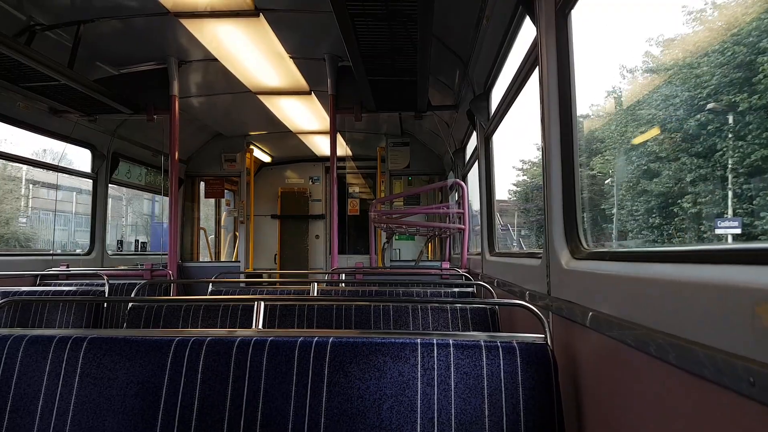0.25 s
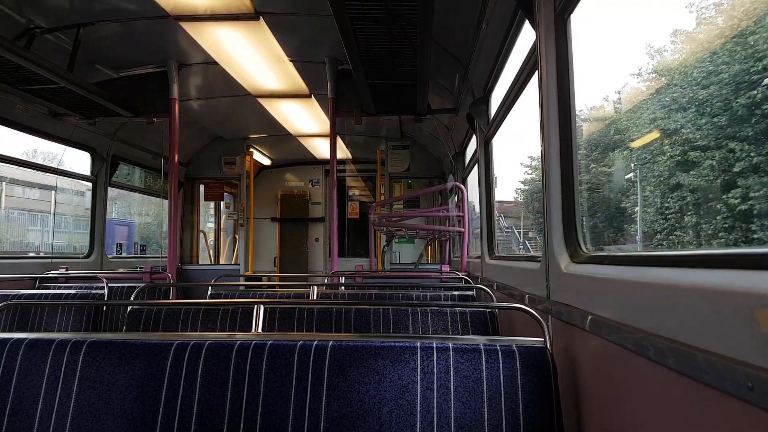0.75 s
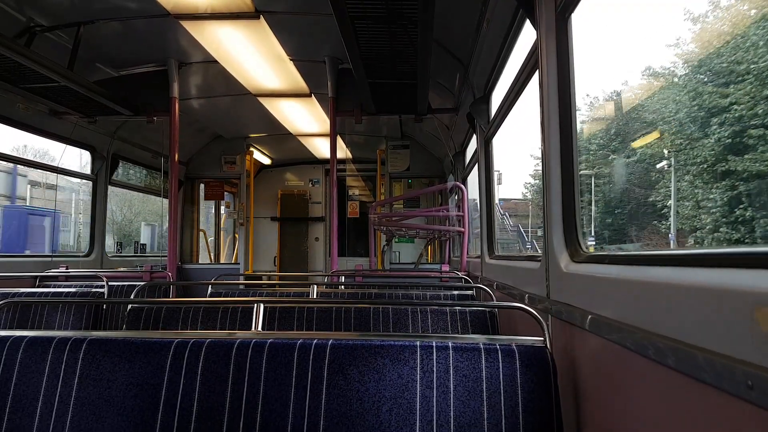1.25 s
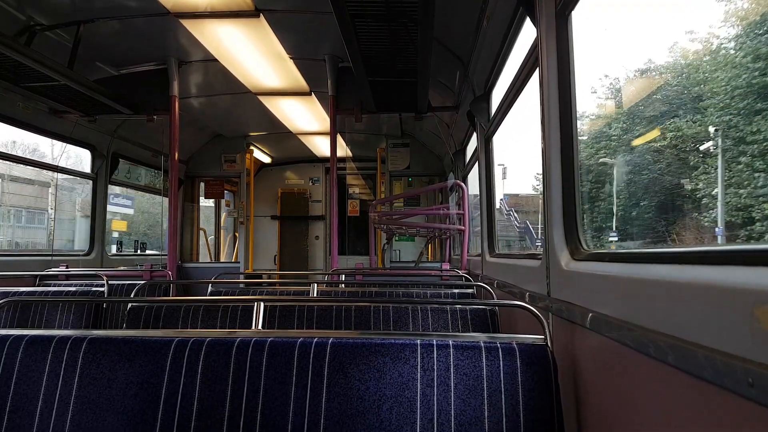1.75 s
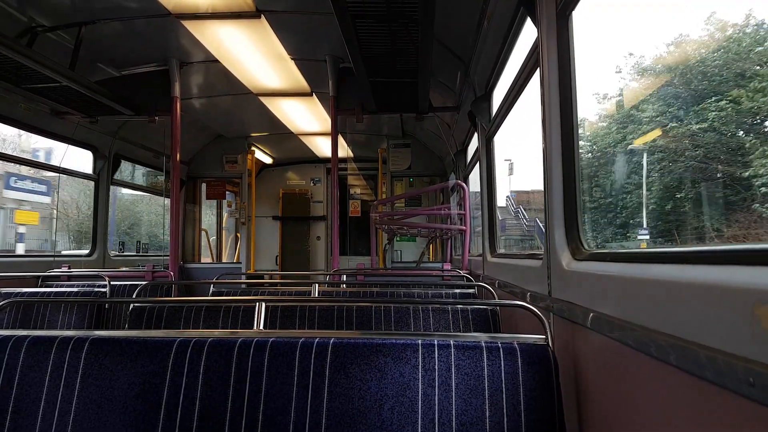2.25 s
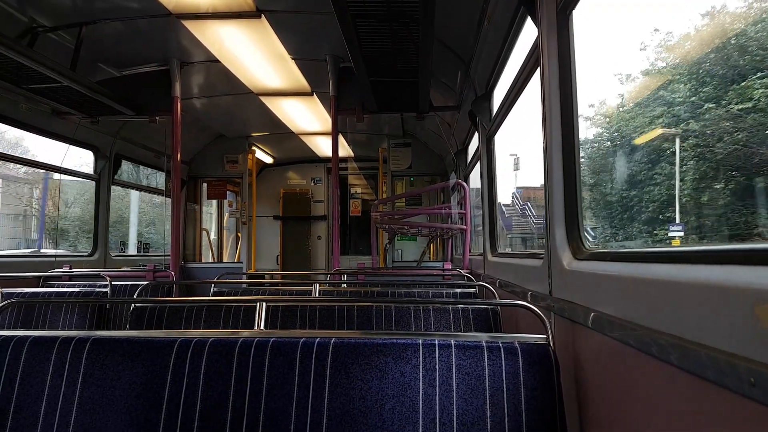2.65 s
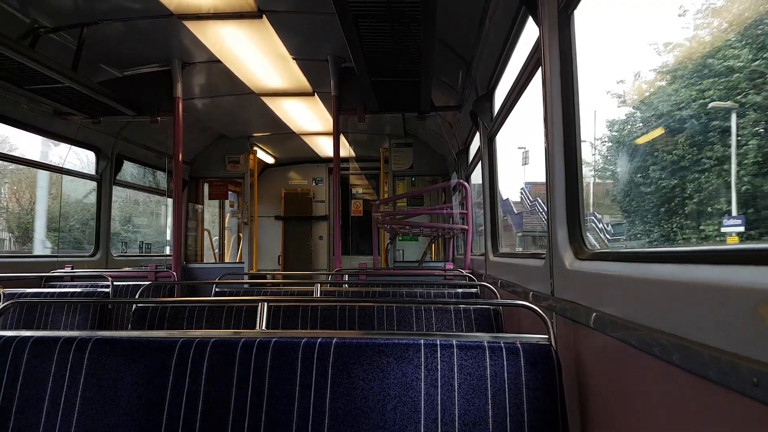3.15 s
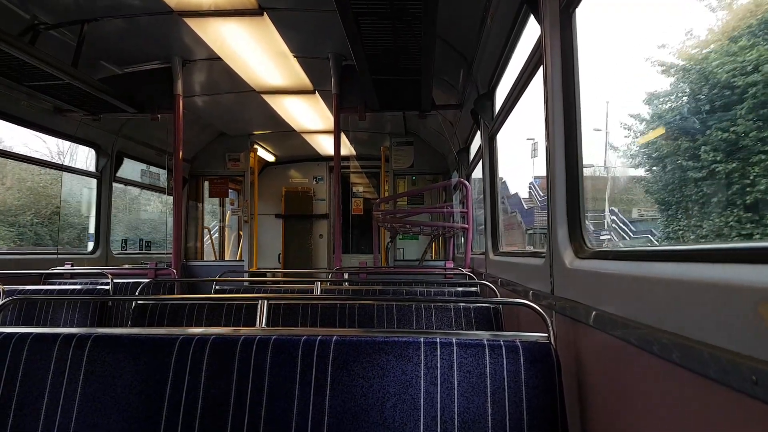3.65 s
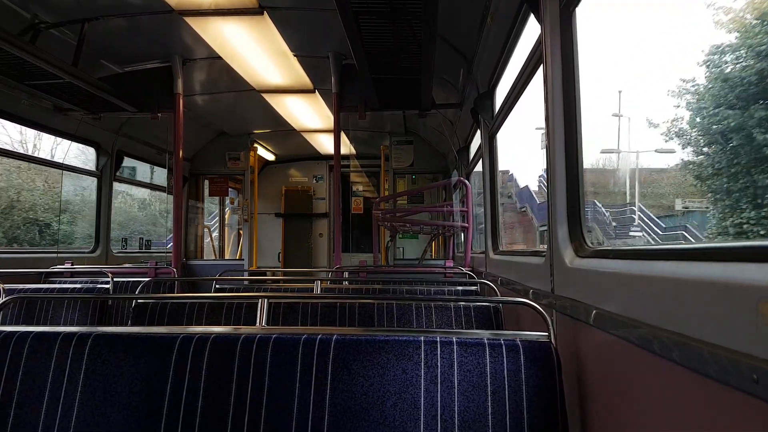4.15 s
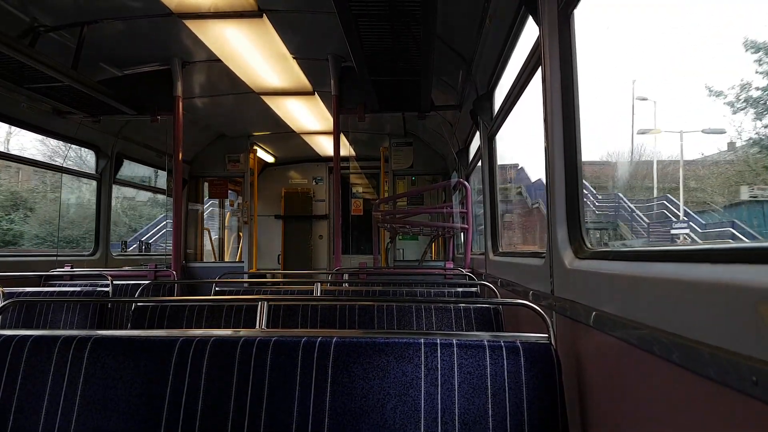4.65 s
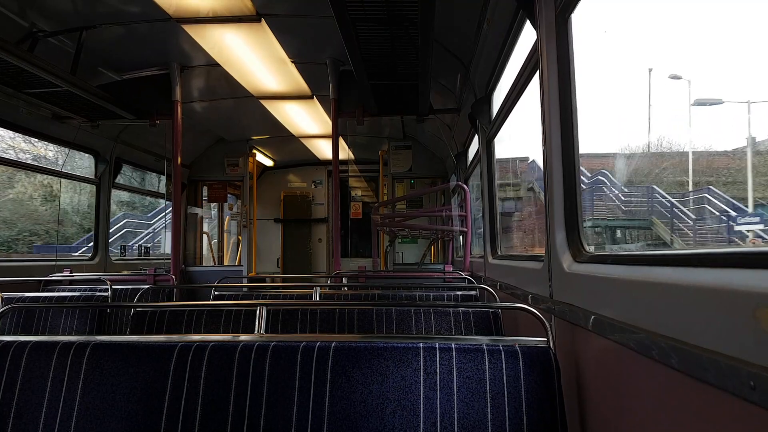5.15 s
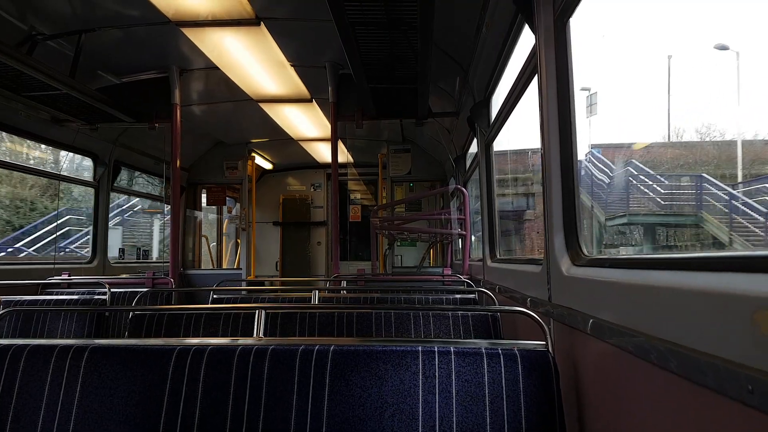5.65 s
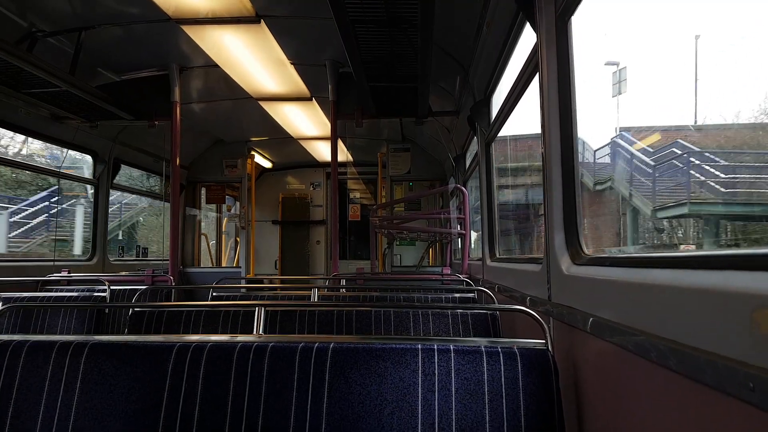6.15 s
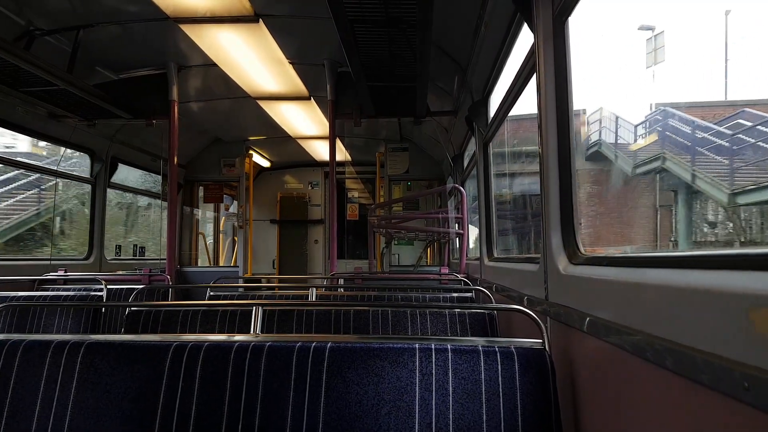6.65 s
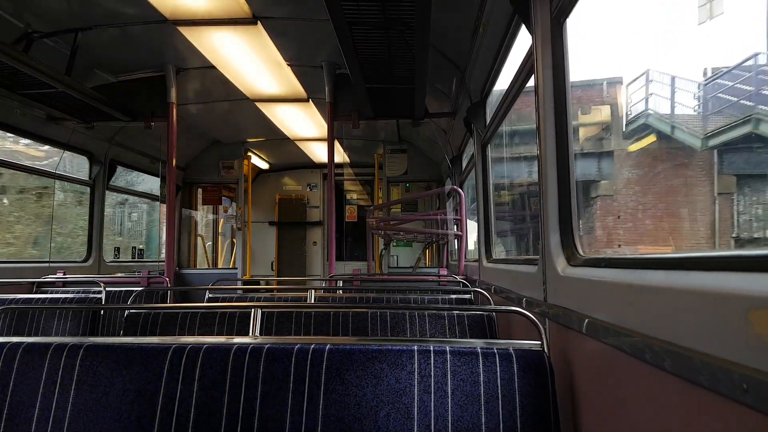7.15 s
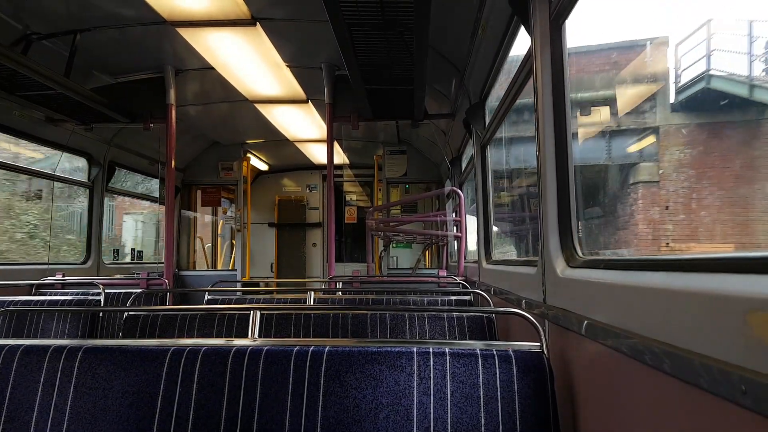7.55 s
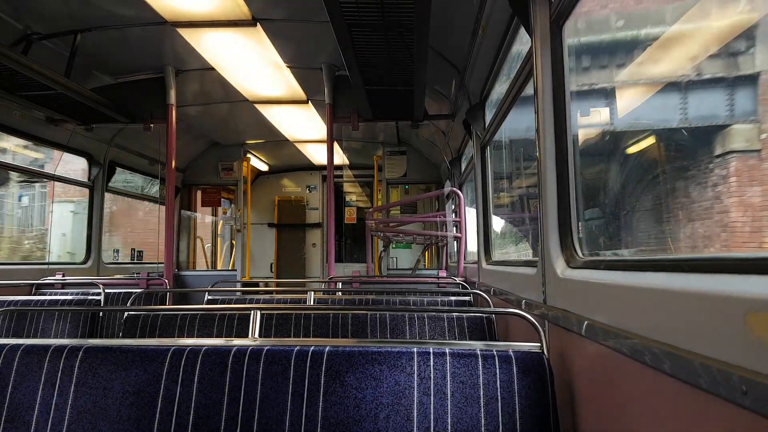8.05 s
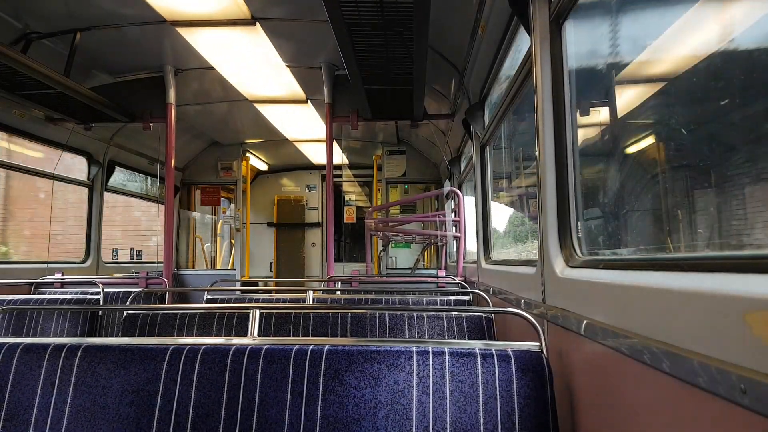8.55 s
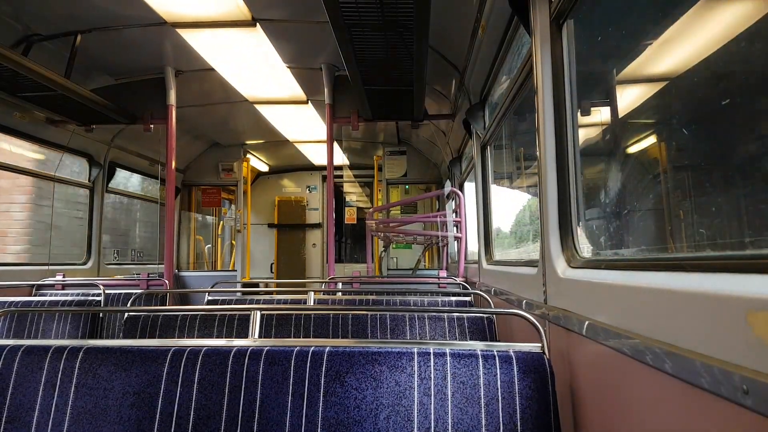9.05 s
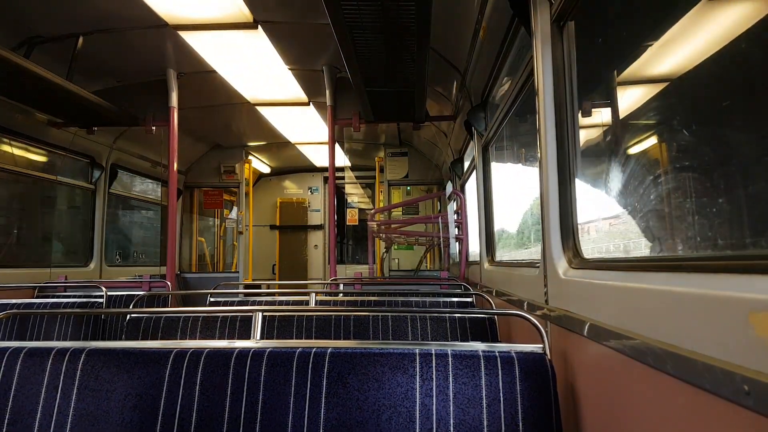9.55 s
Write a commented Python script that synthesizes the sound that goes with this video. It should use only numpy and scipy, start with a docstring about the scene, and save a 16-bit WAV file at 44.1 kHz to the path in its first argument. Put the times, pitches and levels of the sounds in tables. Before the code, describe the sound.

A small diesel train gathers speed, heard from the passenger seats. Two engines make a deep, beating drone that dominates throughout and steps up in pitch about a third of the way in. Beneath it the wheels rumble and hiss, the drive shaft faintly squeals, ticks and chirps, and loose fittings buzz between occasional floor thuds. Finally the wheels ring with a high, pulsing squeal as the train runs under a bridge.

```python
"""Inside the empty saloon of a diesel railbus that pulls away from a station and runs under a bridge.
Two underfloor engines drone at slightly different speeds and throb against each other; a fan hums and
a gear whines. Rolling noise grows with speed and the wheel flanges sing. The drive shaft squeals,
ticks and chirps in time with its turns, and the body rattles."""
import sys
import numpy as np
from scipy import signal
from scipy.fft import rfft, irfft
from scipy.io import wavfile
from scipy.ndimage import uniform_filter1d

SR = 44100
rng = np.random.default_rng(int(sys.argv[2]) if len(sys.argv) > 2 else 0)


def unload_audio(sound):
    """Save the sound as a 16-bit wav file, at the path given as the first command line argument."""
    columns = np.transpose(np.atleast_2d(sound))
    # keep every value between -1 and 1, then stretch to whole-number steps
    steps = np.round(np.clip(columns, -1, 1) * 32767)
    wavfile.write(sys.argv[1], SR, steps.astype(np.int16))


N = 431738
TIME = np.arange(N) / SR
BINS = np.fft.rfftfreq(N, 1 / SR)

# Jolts through the floor. Each row: time in seconds, dip in the drone from 0 to 1, thud level in dB.
JOLTS = [(2.3, .2, -34), (2.61, .45, -31), (4.555, .55, -24), (6.98, 0, -24), (8.52, .3, -31)]
# Firing rates at first and in the low and high throttle notch; each engine opens up at opens_s.
NEAR_ENGINE = dict(first_hz=83.8, low_hz=86.5, high_hz=92.1, opens_s=3.1, sag_hz_per_s=.17)
FAR_ENGINE = dict(first_hz=91.5, low_hz=95.54, high_hz=99.8, opens_s=2.91, sag_hz_per_s=.115)
PULL_S, NOTCH_S = 1, .85  # time to reach the low notch, and to go from low to high


def engines():
    """Two firing tones boom and beat; weaker overtones change balance as the revs rise."""
    # Near engine. Each row: multiple of the six-cylinder cycle, level in dB in the low and high notch.
    cycle_orders = [(1, -64, -51), (5, -46, -37), (7, -48, -44), (12, -39, -39), (18, -53, -41.5),
                    (20, -54, -58), (37, -66, -49.5), (42, -52, -64), (46, -70, -49), (79, -70, -66),
                    (92, -61, -70), (100, -75, -56)]
    near_hz, far_hz = firing(**NEAR_ENGINE), firing(**FAR_ENGINE)
    near, far = turns(near_hz), turns(far_hz)
    near_db = settling(-11.5, offset_db=-6, seconds=.48) + .3 * drift(4)
    far_db = settling(-27.5, offset_db=5.5, seconds=1.1) + .8 * drift(2)
    boom = amp(near_db) * np.cos(2 * np.pi * near) - amp(far_db) * np.cos(2 * np.pi * far)
    for s, depth, _ in JOLTS:
        boom *= 1 - depth * bump(s, .025)
    revs = notch()
    cycle, cycle_hz = near / 6, near_hz.mean() / 6
    overtones = sum(amp(low + (high - low) * revs) * tone(k * cycle, k * cycle_hz, waver=.25)
                    for k, low, high in cycle_orders)
    far_fourth = tone(4 * far, 4 * far_hz.mean(), waver=.25)
    return np.sqrt(2) * boom + overtones + amp(-53 - 13 * revs) * far_fourth


def running_gear():
    """Wheels shake the floor and roar on the rails; panel modes colour the low range."""
    # Four noise colours, dark to bright. Each row: frequency in Hz, relative level in dB.
    rumble = [(12, -20), (30, -13), (48, -2.5), (70, -3.5), (100, 2), (150, -4), (200, -7), (250, -8),
              (330, -12.5), (450, -24), (700, -60)]
    roar = [(200, -33), (340, -3.5), (450, -1), (620, -0.5), (800, -5), (1080, -2.5), (1400, -9.5),
            (2000, -12.5), (3500, -48.5)]
    hiss = [(700, -28), (1400, 2), (1900, 0), (2500, -2.5), (3200, -7.5), (4400, -12), (5100, -18),
            (6500, -20), (8200, -23), (9000, -39.5), (14000, -44.5)]
    fizz = [(4000, -21), (7000, -0.5), (9500, -1.5), (11500, -1), (13300, -0.5), (14200, -3.5), (15700, -8)]
    roar_swell, hiss_swell = swells()
    ripple = unit(uniform_filter1d(uniform_filter1d(rng.standard_normal(len(BINS)), 160), 160))
    panels_db = .9 * ripple / (1 + (BINS / 1500) ** 2)  # higher up the modes overlap and even out
    track = drift(25)  # rough rail, shared by roar and hiss
    firings = turns(firing(**NEAR_ENGINE))
    clatter = np.cos(2 * np.pi * firings)  # each firing shakes the trim
    crank = np.cos(2 * np.pi * firings / 3)  # so does each turn of the crankshaft
    shudder = np.cos(4 * np.pi * turns(shaft_speed()))  # and the shaft joints, twice a turn
    rumble_db = driven(-28, notch_db=.5, doubling_db=1.7) + .5 * drift(13)
    roar_db = driven(-36.5, notch_db=2.13, doubling_db=.6) + roar_swell + .76 * track
    hiss_db = driven(-43.5, notch_db=2.7, doubling_db=.9) + hiss_swell + .69 * track + .36 * clatter
    out = sum(amp(db) * saloon_noise(amp(spectrum(colour) + panels_db))
              for db, colour in [(rumble_db, rumble), (roar_db, roar), (hiss_db, hiss)])
    fizz_db = driven(-74, notch_db=10.4, doubling_db=1.5) + .8 * drift(25) + 1.1 * drift(300)
    shake_db = .5 * clatter + 1.1 * crank * notch() + .6 * shudder
    return out + amp(fizz_db + shake_db) * saloon_noise(amp(spectrum(fizz)))


def wheels():
    """A worn tread drums; the rubbing flanges sing one note, louder and cleaner at each bite."""
    # Flange bites. Each row: time in seconds, strength in dB.
    flange_bites = [(8.51, 6.5), (8.6, 7), (8.75, 7), (8.9, 5), (9.04, 8.5), (9.16, 5.5), (9.3, 7.5)]
    angle = turns(shaft_speed()) / 4.46  # shaft turns to one wheel turn
    contact = np.cos(np.pi * (angle + .18)) ** 4  # once a wheel turn
    roar_swell, _ = swells()
    drum = amp(-29.5 + 1.7 * roar_swell) * contact * ringing(148, 86)
    bites = sum((amp(db) - 1) * bump(s, .021) for s, db in flange_bites)
    note = tone(turns(1946 + 32 * drift(70)), 1948, waver=.15)
    flange = spell(7.5, 13, attack=1.2, release=1, db=-42) * (ringing(1948, 90) + 1.4 * bites * note)
    return drum + flange


def fan():
    """Blade hum with two overtones: it builds up, then fades slowly once the near engine opens up."""
    blade_hz, overtones_db, fade_db_per_s = 351, [0, -12, -14], 1
    db = settling(-40, offset_db=-4, seconds=.78) - fade_db_per_s * since(NEAR_ENGINE["opens_s"])
    blades = turns(blade_hz + .798 * drift(1.5))
    hum = sum(amp(level) * tone(k * blades, k * blade_hz, waver=.12)
              for k, level in enumerate(overtones_db, 1))
    return amp(db) * (hum + .22 * ringing(blade_hz, 30))  # turbulent inflow roughens the note


def shaft():
    """A dry spot rubs as the drive shaft turns: first a thin squeal, then ticks, then rising chirps."""
    angle = turns(shaft_speed())
    angle -= np.interp(4.196, TIME, angle)  # a turn starts at this second

    def stroke(at, length):
        """Swells once a turn, at this part of the turn."""
        return np.exp(-(((angle - at + .5) % 1 - .5) / length) ** 2)

    def knock(at, length):
        """Starts at once and dies away within the turn."""
        return np.exp(-((angle - at) % 1) / length)

    squeal = unit(ringing(8565, 90) * (2.2 + stroke(.05, .2))
                  + .8 * ringing(8730, 40) * (.63 + stroke(.23, .23)))
    tick_ring = (ringing(12900, 450) + .8 * ringing(13400, 600)
                 + .55 * ringing(14200, 700) + 1.05 * ringing(11500, 4500))
    knocks = knock(-.04, .11) + .7 * knock(.47, .11) + .16
    ticks = unit(tick_ring * knocks * amp(2.5 * drift(12)))
    chirp_start_s, chirp_hz, climb_hz, sink_hz_per_s = 5.6, 5800, 1400, 750
    rub = (angle + .2) % 1  # each chirp climbs while the spot passes
    centre = chirp_hz - sink_hz_per_s * (TIME - chirp_start_s)
    pitch = centre + climb_hz * (rub - .5) + 130 * drift(20) + 150 * drift(400)
    sweep = np.cos(2 * np.pi * turns(pitch) + 1.3 * np.array([drift(300), drift(300)]))
    scrape = .3 * ringing(chirp_hz, 800) * stroke(.59, .38)
    chirps = unit((sweep * stroke(.27, .2) + scrape) * amp(1.5 * drift(6)))
    return (spell(.42, 2.08, attack=.15, release=.26, db=-53.5) * squeal
            + spell(3.95, 5.95, attack=.2, release=.3, db=-61) * ticks
            + spell(chirp_start_s, 6.44, attack=.18, release=.25, db=-55.5) * chirps)


def body():
    """Loose fittings buzz briefly, and jolts thud through the floor."""
    # Each row: time in seconds, level in dB, half length in seconds, centre in Hz, width in octaves.
    rattles = [(3.348, -55, .02, 11500, 0.54), (3.353, -50.5, 0.025, 3600, .3),
               (4.193, -51, 0.018, 7500, .7), (6.07, -57, .03, 9000, .6), (6.748, -49, .035, 6400, 0.38),
               (7.254, -59.5, 0.36, 7200, .25), (8.036, -65, .04, 11000, .5)]
    out = np.zeros((2, N))
    grain = amp(2.5 * drift(150))
    for s, db, length, hz, octaves in rattles:
        colour = np.exp(-.5 * (np.log2((BINS + 1) / hz) / octaves) ** 2)
        out += amp(db) * bump(s, length) * grain * saloon_noise(colour)
    thuds = sum(amp(db) * bump(s, .025) for s, _, db in JOLTS)
    return out + thuds * ringing(120, 110)


def gear():
    """A rough whine that climbs and comes forward as the far engine opens up, then slowly recedes."""
    opens_s, rise_s, rise_db, fade_db_per_s = FAR_ENGINE["opens_s"], .7, 8, 1.2
    mesh_hz = 45.5 * firing(**FAR_ENGINE)
    db = -67.5 + rise_db * ramp(opens_s, rise_s) ** 4 - fade_db_per_s * since(opens_s + rise_s)
    phases = np.array([turns(mesh_hz + 45 * drift(60)) for _ in range(2)])
    return amp(db) * np.sqrt(2) * np.cos(2 * np.pi * phases)


def high_whine():
    """A high, rough whine that comes in after the engines open up."""
    return spell(3.3, 10.5, attack=2, release=2, db=-62) * amp(1.8 * drift(14)) * ringing(4540, 190)


def loose_panel():
    """A panel ticks faintly with each cycle of the near engine."""
    cycle = turns(firing(**NEAR_ENGINE)) / 6
    knocks = np.exp(-(cycle % 1) / .13) * amp(2 * drift(8))
    return spell(5.8, 10, attack=1.5, release=.8, db=-72) * unit(knocks * ringing(9900, 1800))


def firing(first_hz, low_hz, high_hz, opens_s, sag_hz_per_s):
    """Firing rate in Hz: up to the low notch, on to the high one, then a slow sag under load."""
    climb = (low_hz - first_hz) * ramp(0, PULL_S) + (high_hz - low_hz) * ramp(opens_s, NOTCH_S)
    return first_hz + climb - sag_hz_per_s * since(opens_s + NOTCH_S)


def notch():
    """Effort of the near engine: 0 in the low notch, 1 in the high one."""
    return ramp(NEAR_ENGINE["opens_s"], NOTCH_S)


def shaft_speed():
    """The drive shaft spins up as the railbus gathers speed."""
    # Each row: time in seconds, turns a second.
    speeds = [(0, 7.5), (1.3, 8.7), (4.2, 11.6), (5, 12.15), (6, 13.2), (9.8, 16)]
    return np.interp(TIME, *np.transpose(speeds))


def driven(db, notch_db, doubling_db):
    """A level in dB that rises with engine effort and with each doubling of speed."""
    speed = shaft_speed()
    return db + notch_db * notch() + doubling_db * np.log2(speed / speed[0])


def swells():
    """Extra roar and hiss in dB, on rough rail and under the bridge."""
    # Each row: peak time in seconds, half length in seconds, roar rise in dB, hiss rise in dB.
    stretches = [(3.904, 0.5, 2, 0), (6.676, 0.48, 4, 2), (9.8, 0.72, 3.5, 3.5)]
    return sum(np.outer([roar, hiss], bump(s, length)) for s, length, roar, hiss in stretches)


def saloon_noise(gain):
    """Noise in the saloon: alike at both ears in the bass, diffuse in the treble."""
    # Each row: frequency in Hz, left-right correlation from -1 to 1.
    likeness = [(60, 1), (140, 0.96), (200, 1), (290, 0.68), (640, 0.4), (1400, -0.28), (3000, 0.017)]
    mid, side = rfft(rng.standard_normal((2, N)))
    same = np.clip(spectrum(likeness), -1, 1)
    mid, side = mid * np.sqrt(1 + same), side * np.sqrt(1 - same)
    return unit(irfft(np.array([mid + side, mid - side]) * gain, N))


def ringing(hz, width_hz):
    """One resonance kept sounding by noise."""
    return saloon_noise(1 / (1 + (2 * (BINS - hz) / width_hz) ** 2))


def tone(phase, hz, waver):
    """A machine note that wavers as panels shake; high notes reach each ear differently."""
    apart = min(hz / 900, 1.2) * np.array([[.5], [-.5]])
    level = np.sqrt(2) * (1 + waver * drift(3.4))
    return level * np.cos(2 * np.pi * (phase + rng.random()) + waver * drift(.58) + apart)


def drift(rate):
    """Random wander of rms 1, changing up to about rate times a second."""
    return unit(irfft(rfft(rng.standard_normal(N)) * np.exp(-.5 * (BINS / rate) ** 2), N))


def spell(start, end, attack, release, db):
    """Gain that rises, holds and dies away; times in seconds."""
    return amp(db) * ramp(start, attack) * (1 - ramp(end - release, release))


def settling(db, offset_db, seconds):
    """A level in dB that starts offset and settles."""
    return db + offset_db * np.exp(-TIME / seconds)


def ramp(start, length):
    """Rises evenly from 0 to 1."""
    return np.clip((TIME - start) / length, 0, 1)


def bump(peak_s, half_length_s):
    """A bell-shaped swell from 0 to 1 and back."""
    return np.exp(-((TIME - peak_s) / half_length_s) ** 2)


def since(start):
    """Seconds since start, 0 before it."""
    return np.maximum(TIME - start, 0)


def spectrum(points):
    """A curve over log frequency, read at every bin."""
    hz, value = np.transpose(points)
    return np.interp(np.log(BINS + 1), np.log(hz), value)


def turns(hz):
    """Revolutions made so far."""
    return np.cumsum(hz) / SR


def amp(db):
    """Decibels to gain."""
    return 10 ** (np.asarray(db) / 20)


def unit(x):
    """Scales to rms 1."""
    return x / np.sqrt(np.mean(x ** 2) + 1e-20)


def scene():
    """The full mix; engines, fan and rolling noise lean a little to the left."""
    drone = engines() * amp([[.75], [-.75]])
    bed = (fan() + running_gear() + wheels() + high_whine()) * amp([[.4], [-.4]])
    return drone + bed + gear() + shaft() + loose_panel() + body()


def record(dry):
    """A steep low-pass takes off the very top of the treble."""
    low_pass = signal.firwin(511, cutoff=15750, window=("kaiser", 9), fs=SR)
    return signal.oaconvolve(dry, low_pass[None], "same")


dry = scene()
out = record(dry)
unload_audio(out)
```